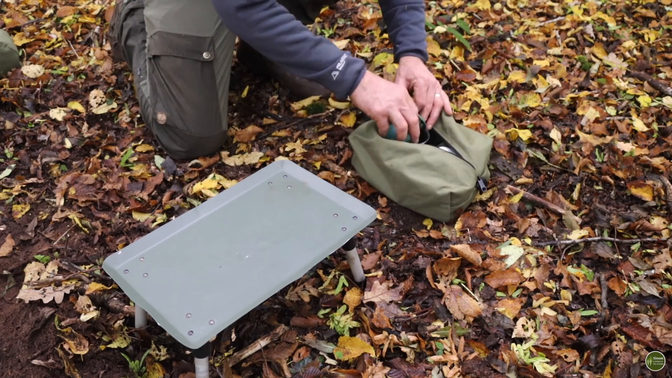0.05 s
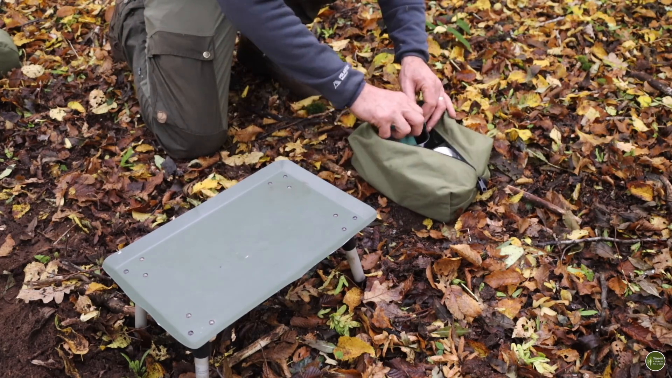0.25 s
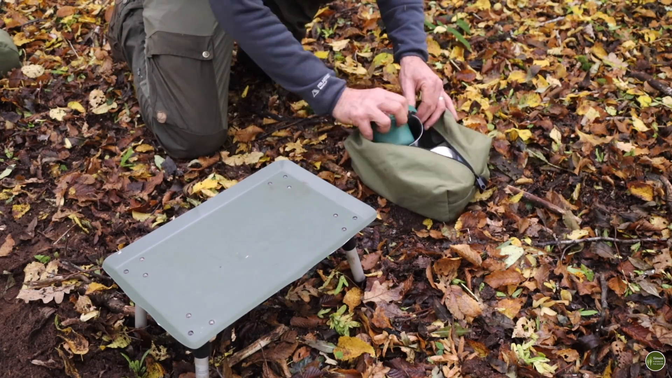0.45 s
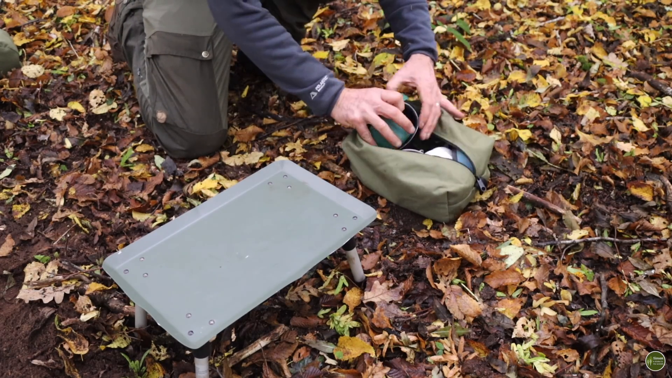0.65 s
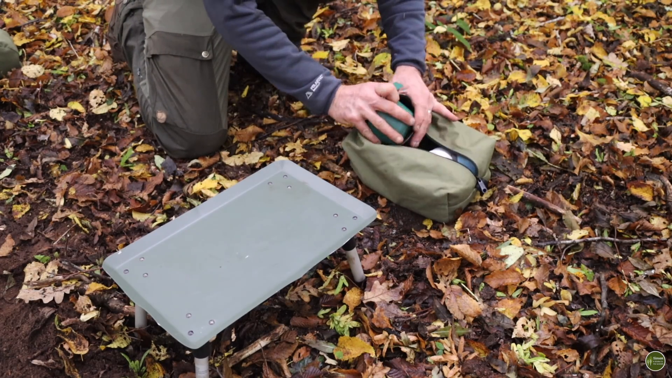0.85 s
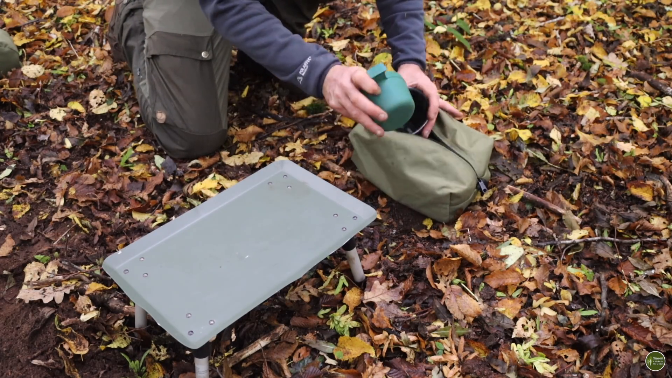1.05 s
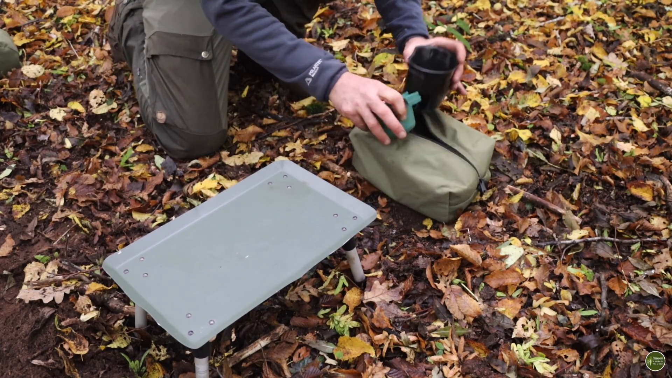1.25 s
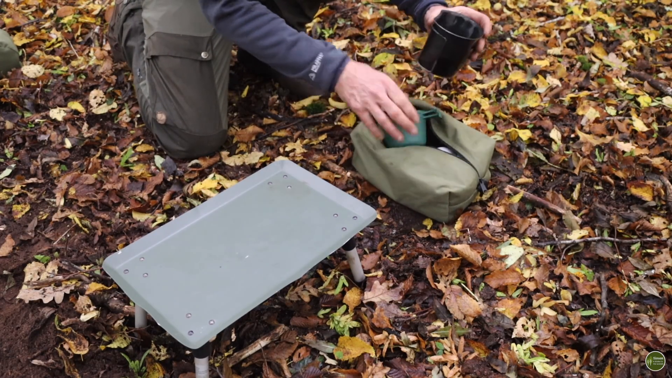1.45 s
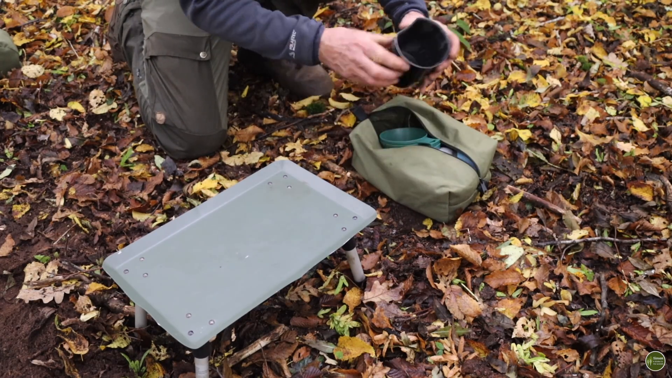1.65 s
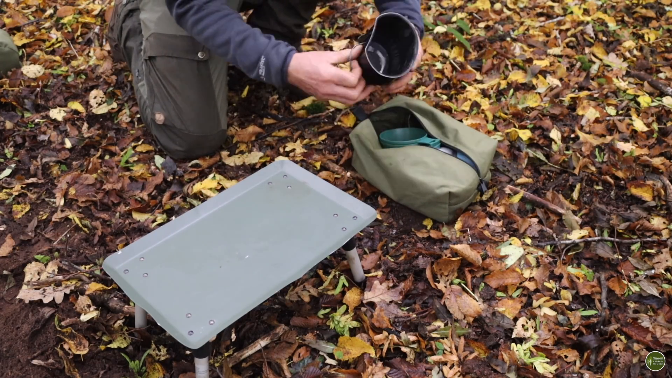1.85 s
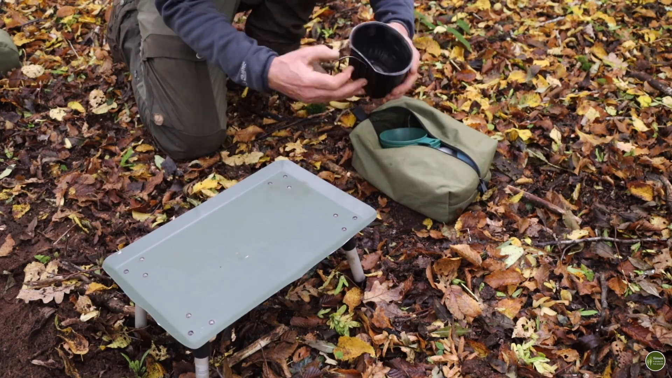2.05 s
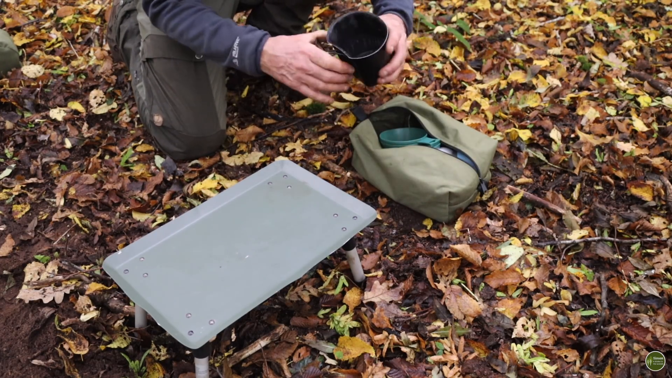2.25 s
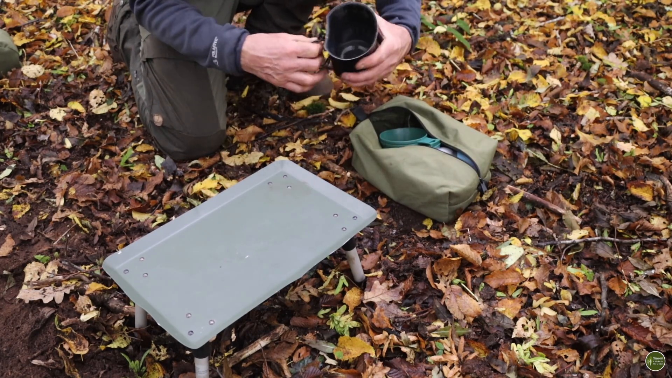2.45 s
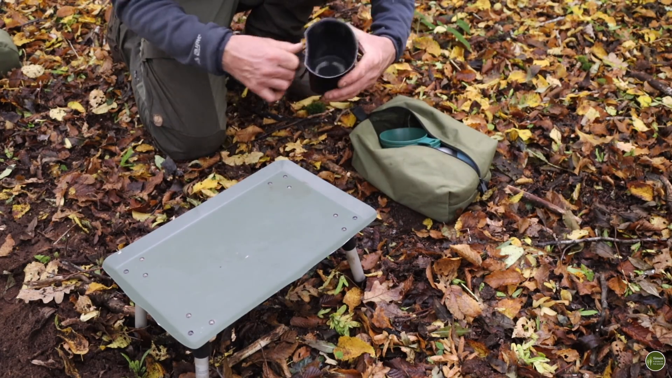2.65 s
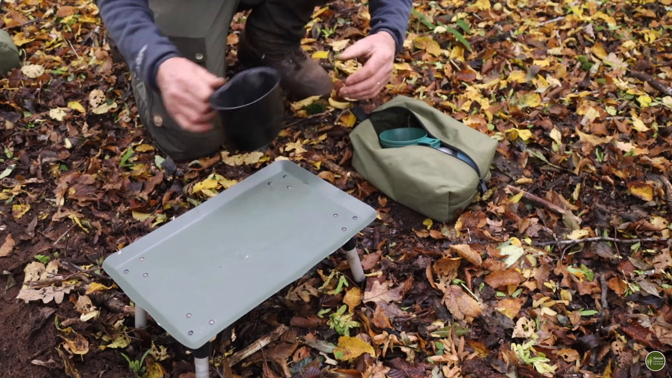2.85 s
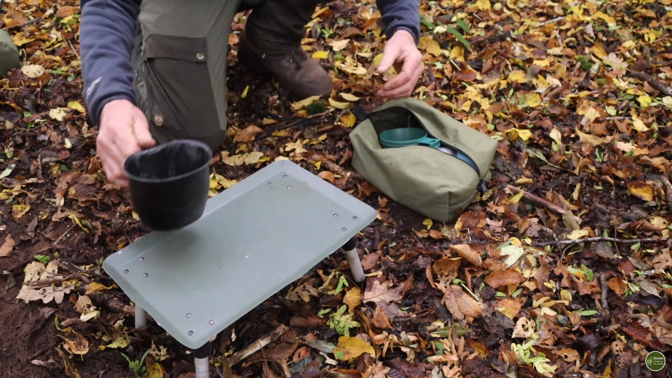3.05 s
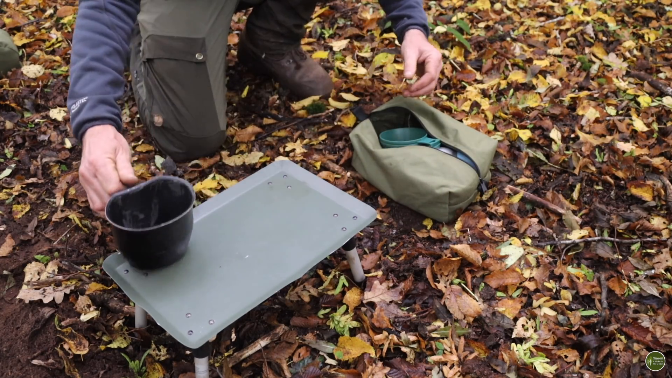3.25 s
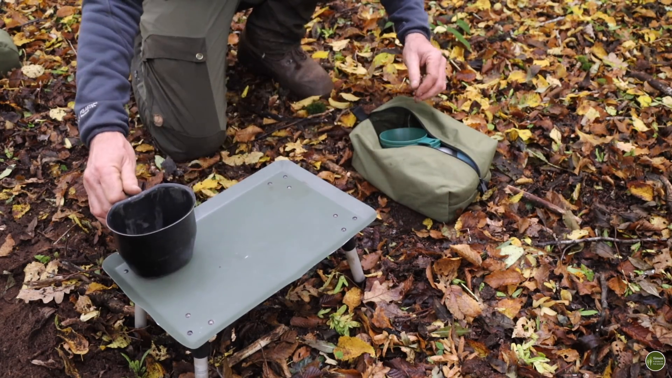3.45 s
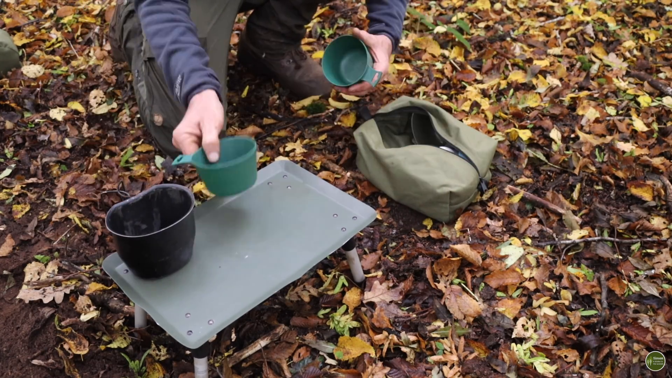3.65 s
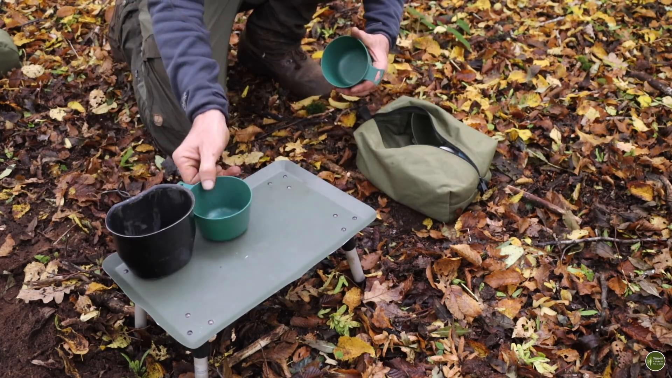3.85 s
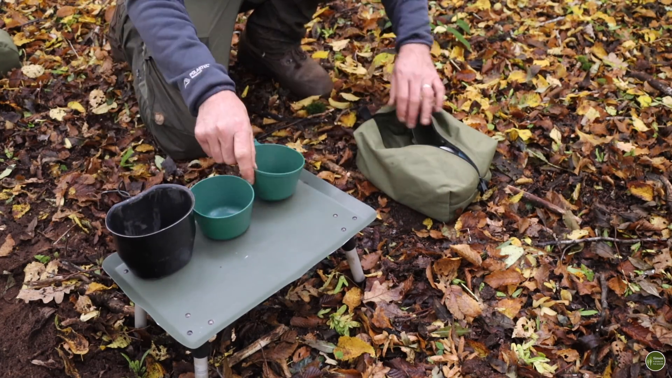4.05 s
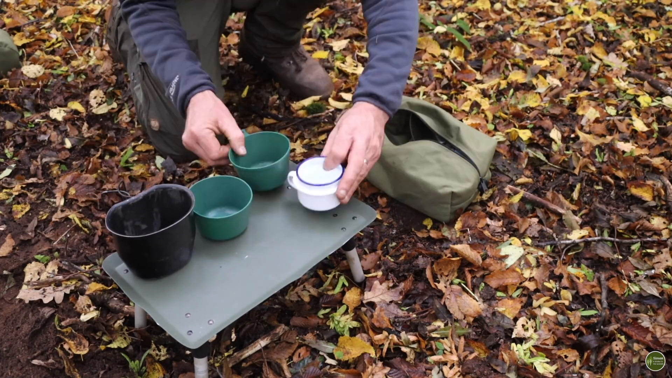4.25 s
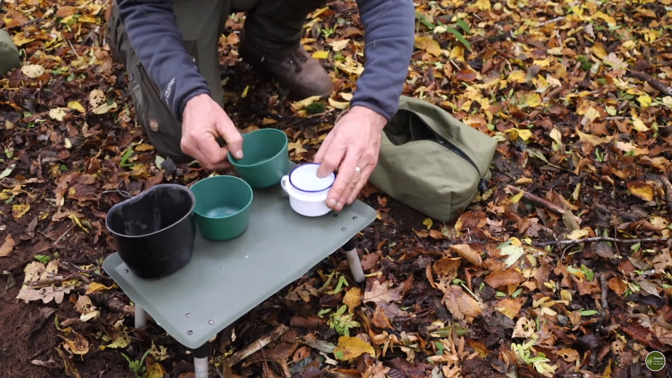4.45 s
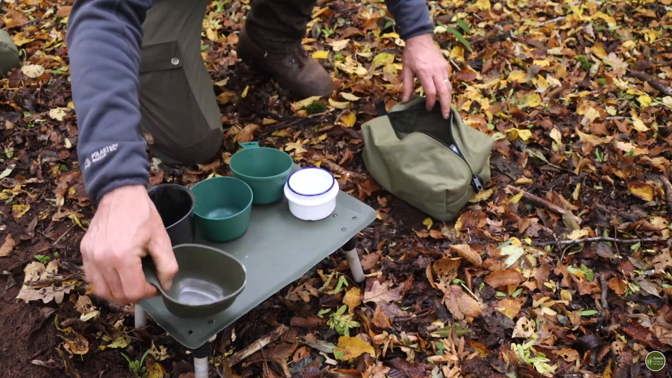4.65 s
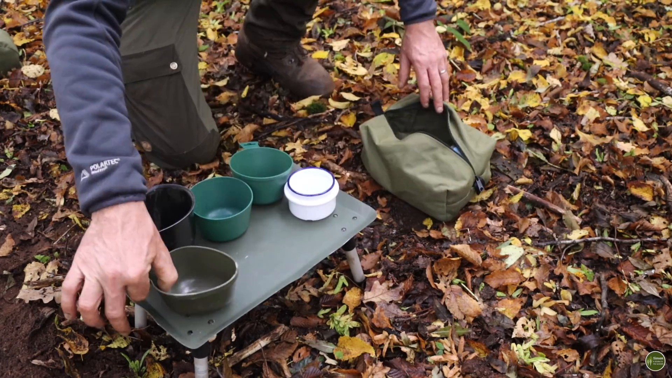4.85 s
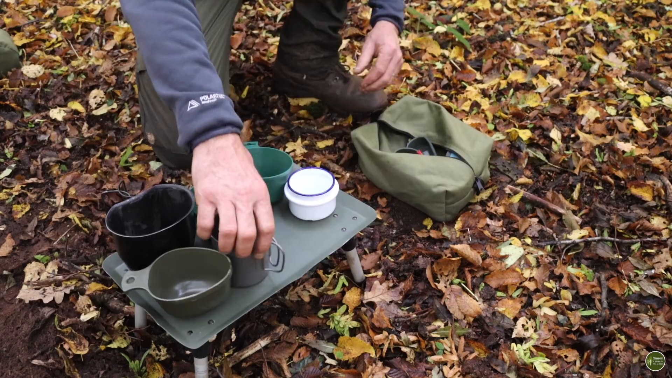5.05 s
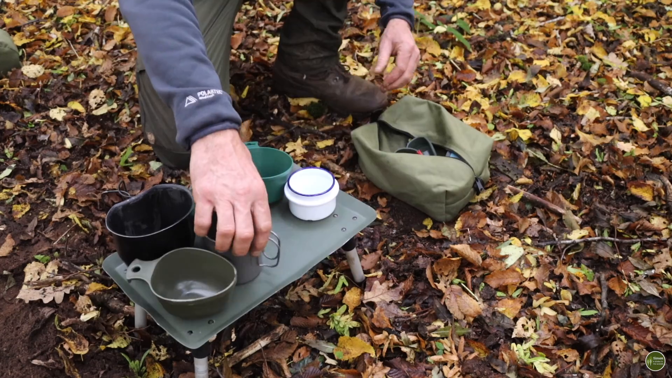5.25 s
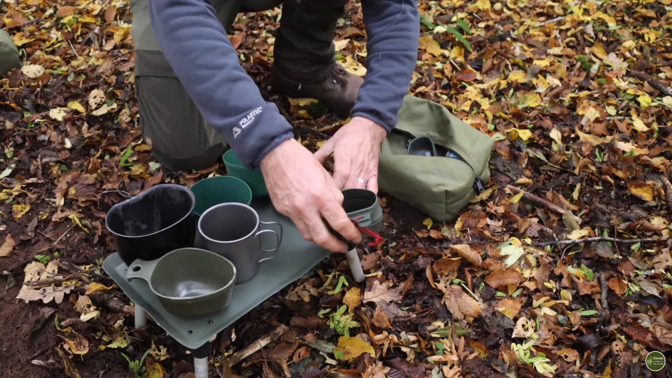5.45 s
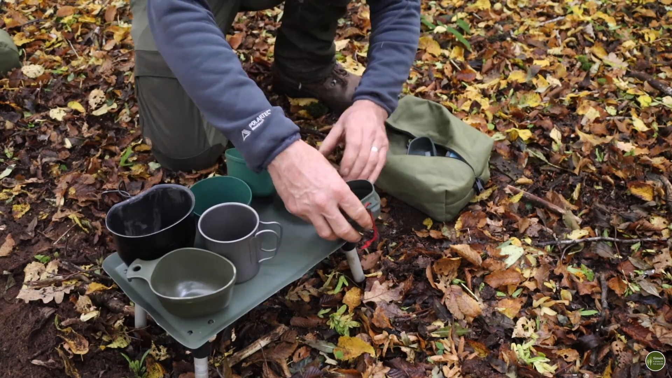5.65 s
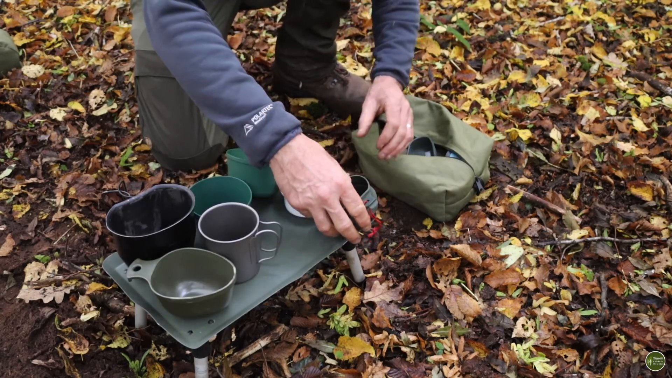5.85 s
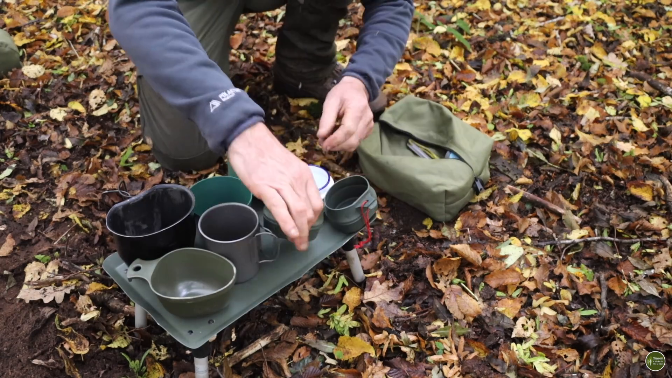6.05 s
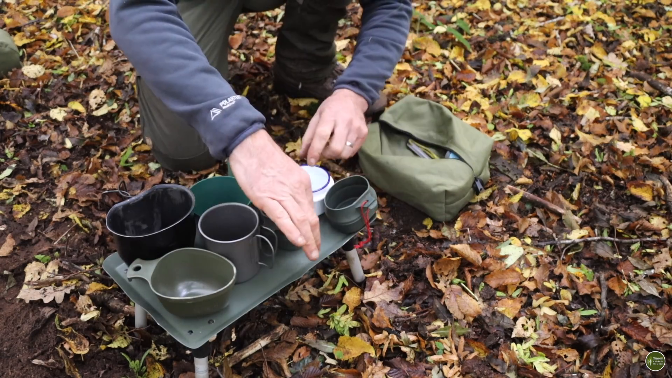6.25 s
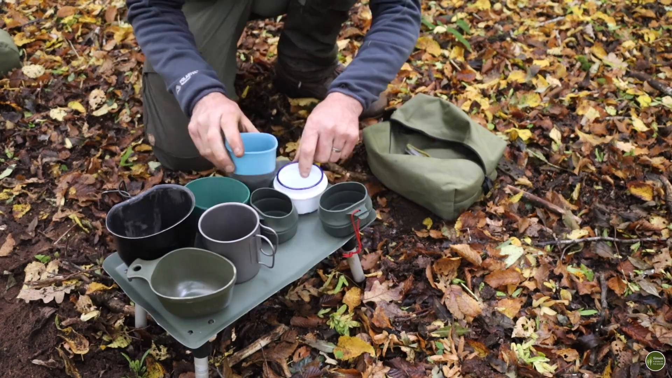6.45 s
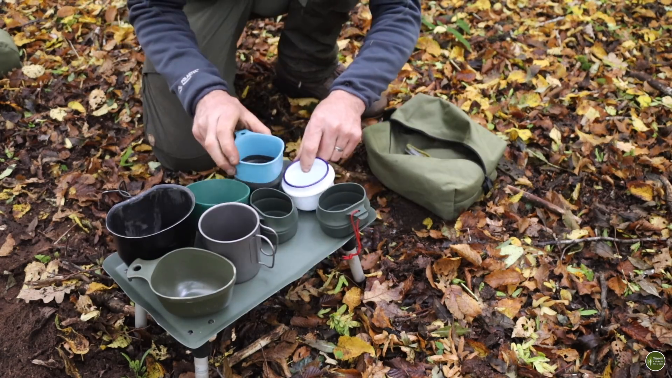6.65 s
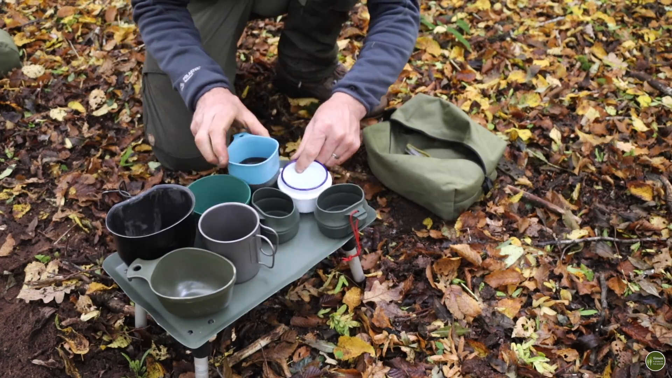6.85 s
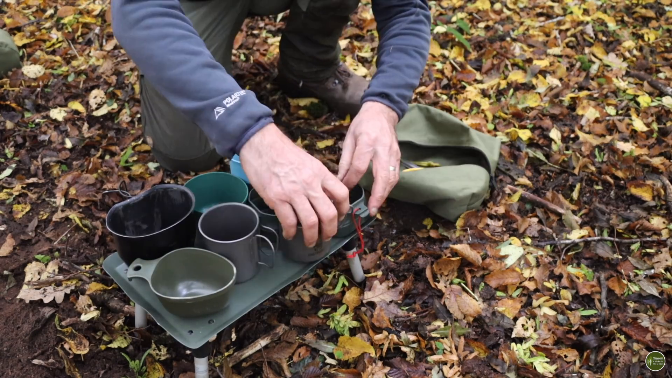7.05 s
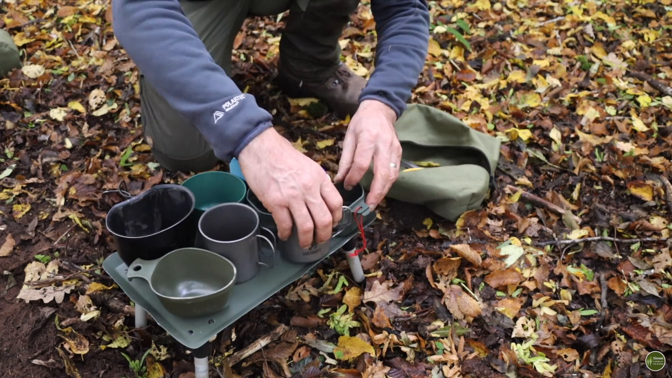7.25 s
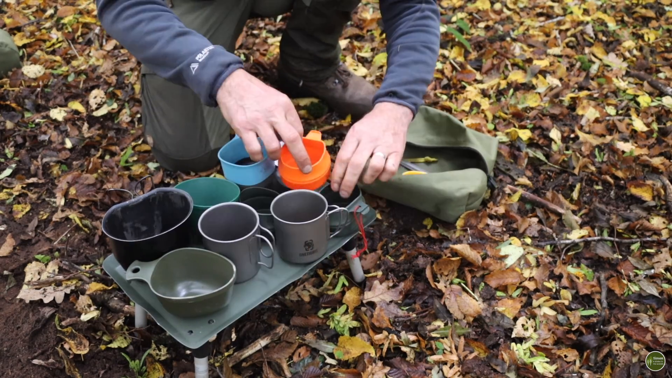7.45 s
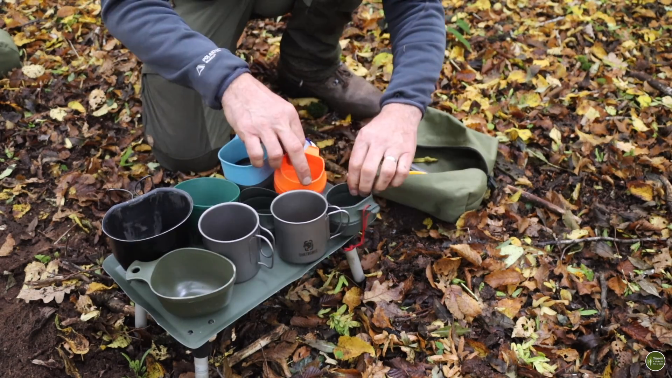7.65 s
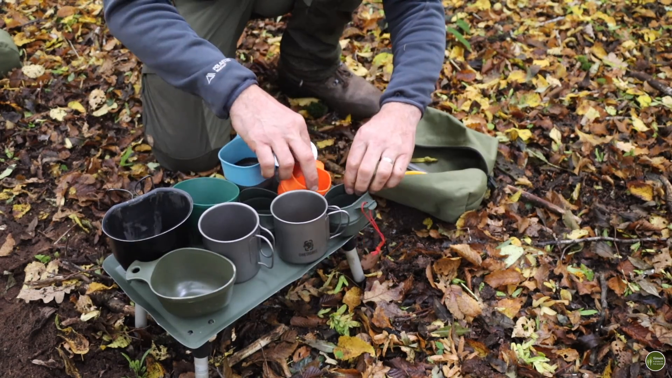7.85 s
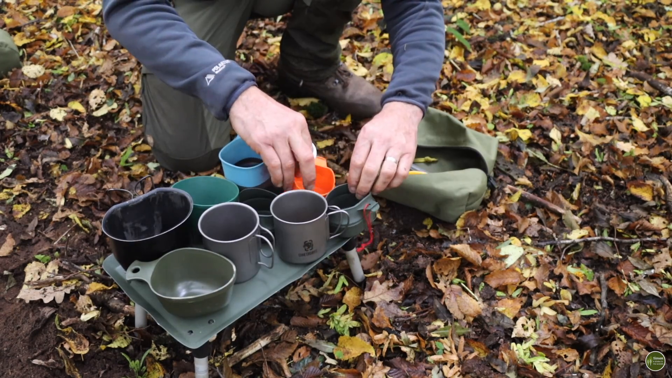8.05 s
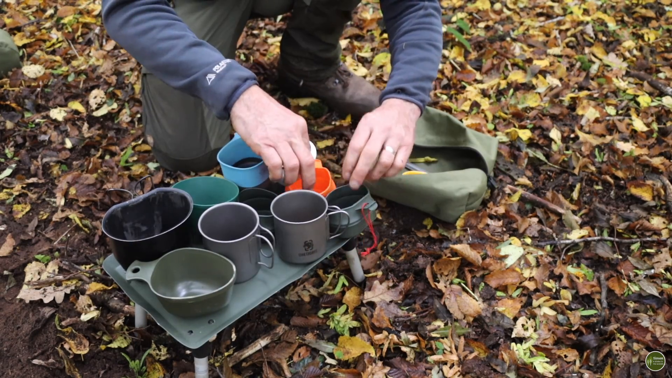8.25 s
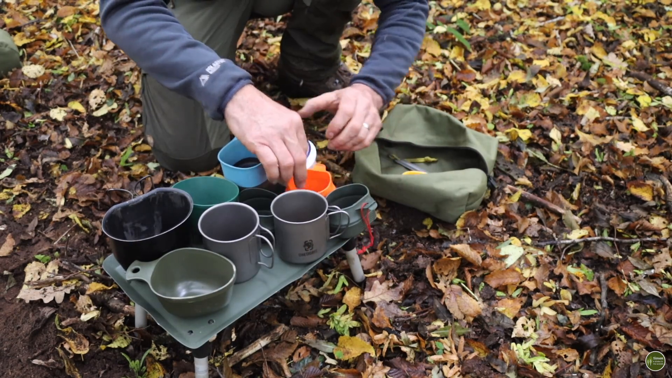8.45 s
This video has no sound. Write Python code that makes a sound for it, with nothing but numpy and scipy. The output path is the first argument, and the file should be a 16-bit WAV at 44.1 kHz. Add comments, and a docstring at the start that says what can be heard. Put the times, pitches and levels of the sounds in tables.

```python
"""Camping mugs, close to the microphone in a quiet wood: filtered noise and struck modes knock on a folding
table. First, random slips rub in a cloth bag; wire handles and rims click in the hands, and a cup's hollow
hums. Then plastic and metal mugs land edge first, rock, rattle and slide into place on stick-slip grit. Steel
rims ring faintly as decaying sines; a thin cup chinks with a splash of high modes. Shaped noise gives the far
rumble and leaf hiss; the hardest knocks are flattened at full scale."""
import sys
import numpy as np
from scipy import signal
from scipy.fft import rfft, irfft, next_fast_len
from scipy.io import wavfile
from scipy.ndimage import map_coordinates

SR = 44100
rng = np.random.default_rng(int(sys.argv[2]) if len(sys.argv) > 2 else 0)


def bounce(signal):
    """Save signal as a 16-bit WAV file at the path given by the first command-line argument."""
    frames = np.transpose(np.atleast_2d(signal))
    limited = np.clip(frames, -1, 1)
    pcm = np.round(limited * 32767).astype(np.int16)
    wavfile.write(sys.argv[1], SR, pcm)


N = 375732

# cloth and mugs rubbing in the bag: [t/s, level/dB]
BAG_LEVEL = [(0, -47.5), (.42, -45), (.55, -39.5), (1.5, -41.5), (2.15, -49), (2.769, -53)]
# colour of the cloth rub: [f/Hz, relative level/dB]
CLOTH_COLOUR = [(40, -7), (180, 12.5), (700, 8), (1200, 3.5), (2500, 4.5), (5000, -1), (15000, -28)]
# colour of the distant wood: [f/Hz, relative level/dB]
WOODS_COLOUR = [(30, -23.5), (110, -6), (249, -16), (1040, -15.5), (2000, -30.5), (3340, -27.5),
                (16000, -44.5)]
# mugs and wire handles touching in the hands: [t/s, level/dB, bite/dB, t60/s]
HAND_CLINKS = [(0.072, -31, -3, 0.032), (0.336, -24.5, 5, 0.048), (0.476, -20, 1, 0.075),
               (0.4854, -15.5, 2.5, 0.23), (0.5493, -22, 0, 0.087), (0.633, -32.5, 5, 0.061),
               (0.7164, -17.5, -7, 0.15), (0.728, -19, -1, 0.088), (0.7924, -26, 0.5, 0.064),
               (0.8328, -18, 6.5, 0.059), (0.843, -23, 7, 0.059), (0.9622, -12.5, -2, 0.2),
               (1.0816, -28.5, -19.5, 0.038), (1.157, -33, -23, 0.066), (1.2209, -19.5, -17, 0.19),
               (1.302, -11, -0.5, 0.077), (1.425, -22.5, -7.5, 0.11), (1.567, -17, -17.5, 0.035),
               (1.583, -19, 21, 0.069), (1.647, -13, -14.5, 0.064), (1.683, -15.5, -1.5, 0.16),
               (1.7812, -19.5, 7.5, 0.12), (1.956, -21, -2, 0.27), (2.0903, -18.5, -1.5, 0.2),
               (2.14, -9, -1, 0.096), (2.248, -25.5, 1, 0.15), (2.358, -20, 0, 0.035),
               (2.47, -14, 0, 0.054), (2.618, -28, -0.5, 0.048), (2.7283, -27.5, -8, 0.065),
               (2.753, -32.5, 3, 0.077), (5.0899, -15.5, -5.5, 0.12), (6.713, -34, 12, 0.013),
               (6.749, -30, 12, 0.044), (7.84, -28.5, -6, 0.013), (8.017, -29.5, -4, 0.18)]
# a steel rim left to ring: [t/s, level/dB over the mode levels, centre of the excited modes f/Hz,
# share of the free ring time]
RIM_RINGS = [(0.729, -32, 3980, 0.92), (1.25, -42, 1400, 0.77), (1.302, -32.5, 1390, 0.94),
             (1.583, -30.5, 4150, 0.75), (2.469, -30.5, 4600, 0.67), (5.521, -35, 1660, 0.51),
             (7.014, -45, 1550, 0.71)]
# modes of the steel mug: [f/Hz, relative level/dB, free t60/s]
STEEL_MODES = [(952, 13.5, 0.28), (1560, 11.5, 0.53), (2250, 21, 0.11), (2690, 12, 0.17), (3590, 7, 0.26)]
# a mug scraping in the hands: [start t/s, end t/s, level/dB, tilt/(dB per octave)]
HAND_SCRAPES = [(1.235, 1.283, -25, 0.5), (1.898, 1.932, -24, -2), (2.109, 2.19, -27, -3.5)]
# resonances of the handled cup: [f/Hz, relative level/dB]
CUP_MODES = [(740, 1.8), (2130, 5), (2720, 8.5), (3170, 7.7), (4300, 1.2)]
# a mug lands on one edge, then rocks onto its base:
# [t/s, level/dB, hollow f/Hz, bite/dB, rocking time/s, second contact relative level/dB]
MUG_LANDINGS = [(3.3297, -10, 480, -2.5, 0.035, -0.5), (3.8375, -7, 562, -7, 0.033, -10.5),
                (3.8981, -13.5, 334, -11, 0.018, -14), (4.1196, -7, 940, -15.5, 0.068, -15.5),
                (4.391, -5, 946, -4.5, 0.0072, -11.5), (4.7769, -6.5, 477, -6.5, 0.026, -22),
                (5.136, -11.5, 409, -16, 0.034, -28), (5.517, -8, 520, -7.5, 0.043, -14.5),
                (5.7, -10, 486, -10.5, 0.095, -11), (6.234, -6, 445, -12, 0.042, -17),
                (6.6916, -8, 420, -4.5, 0.054, -17.5), (6.9054, -11.5, 480, -9, 0.029, -1.5),
                (7.2496, -16, 507, -6.5, 0.059, -14.5), (7.376, -13, 524, -4.5, 0.057, -8),
                (7.9579, -15.5, 528, -14.5, 0.025, -22)]
# a mug is bumped while being pushed into place: [t/s, level/dB, bite/dB]
MUG_BUMPS = [(3.4136, -25.5, -4), (3.494, -31.5, -11), (4.207, -26, -13), (4.3844, -12, -4),
             (4.912, -21.5, -11.5), (4.954, -26.5, -15), (5.354, -16.5, -10), (5.377, -18.5, -22),
             (5.461, -19.5, -5), (5.469, -14, -13), (5.767, -27.5, -9), (6.5514, -14.5, -13),
             (6.641, -19.5, 2), (7.014, -19, -19), (7.172, -22, -3), (7.3586, -20, -14.5), (7.445, -34, 12),
             (7.537, -31, -18), (7.579, -27, 9), (7.681, -26.5, -5), (7.701, -25, -13), (7.793, -23.5, -18),
             (7.816, -24, -16), (7.879, -34.5, -9), (8.118, -34.5, -7), (8.165, -20, -14), (8.238, -35, -5),
             (8.337, -22, -11), (8.361, -45, 14), (8.481, -32.5, -12.5)]
# resonances of the table top: [f/Hz, relative level/dB]
TABLE_MODES = [(340, -1.5), (465, -0.5), (820, -1.5), (990, 3), (1450, -1), (2450, -1), (3150, 1)]
# a base sliding on the table: [start t/s, end t/s, level/dB, tilt/(dB per octave)]
BASE_SLIDES = [(4.326, 4.38, -26, -7.5), (4.488, 4.51, -29, -4.5), (4.52, 4.59, -36.5, -7.5),
               (4.955, 5.005, -35, -6.5), (5.245, 5.42, -27, -3.5), (6.415, 6.556, -32.5, -5.5),
               (6.865, 6.91, -25, -8.5), (6.965, 7.17, -40, -9), (7.275, 7.376, -36.5, -1),
               (7.69, 7.755, -39, -6.5), (7.928, 7.957, -30, -11)]
# the thin metal cup touches its neighbour, then chinks: [t/s, level/dB, bite/dB]
CUP_CHINKS = [(6.0635, -17, -16), (6.0965, -10.5, 3)]
# clear modes of the thin metal cup: [f/Hz, relative level/dB]
THIN_CUP_MODES = [(4194, -47), (4400, -47), (6770, -48)]

TOP_HZ = 15950  # band limit
SIZE = 16384  # samples in one contact
T = np.arange(SIZE) / SR  # s
HZ = np.fft.rfftfreq(SIZE, 1 / SR)

# which of a mug's many wall modes ring depends on where it is held and hit:
# (lowest f/Hz, highest f/Hz, relative level/dB)
HELD_WALL = (1300, 9800, 8.1)
STANDING_WALL = (550.3, 5000, 4.6)
THIN_WALL = (5700, 15500, 13.5)  # crowded upper modes of the thin cup
DETUNE = 0.042  # grip and point of contact shift the modes (typical share of their frequency)
HIGH_MODE_DAMPING = 0.1  # ring time falls with frequency (exponent)
GRIP_S = 0.045  # the point of contact moves on this often
CHATTER_RISE_S = 0.00049  # time scale on which the surfaces meet fully

# the cloth crackles and mugs tap inside it: softest level over the rubbing, and range above that
CRACKLE_OVER_DB, CRACKLE_RANGE_DB = -6, 13
CRACKLE_LOW_HZ, CRACKLE_HIGH_HZ, CRACKLE_T60_S = 1000, 4500, 0.04

# the top treble of a clink grows with its bite and with its strength (dB per dB)
TICK_PER_BITE, TICK_PER_LEVEL = 0.74, 0.58
# a sharper contact lifts the body of the sound (Hz at zero bite, octaves per dB)
CLINK_HOLLOW_HZ, HOLLOW_PER_BITE = 840, 0.031
GRAZE_S, GRAZE_DB = 0.019, -21.5  # a rim grazes this long before it clicks, this much more softly

SWELL_DB = 5.5  # a stroke presses harder towards its end
CATCHES_PER_S, CATCH_DB = 110, -2.5  # coarse jerks: mean rate, and level over the fine grit

BUMP_HOLLOW_HZ = 420
KNOCK_TICK_DB = -12.5  # top treble of a full-scale knock, relative to its bite
KNOCK_TICK_PER_LEVEL = 0.31  # softer knocks lose treble (dB per dB)
PUSH_PER_LEVEL = 0.51  # soft knocks lack the first sharp push (dB per dB)
KNOCK_CYCLES = 46.5  # cycles of the hollow in which a knock loses 60 dB
BOOM_DB, BOOM_CYCLES = 8.5, 54  # hollow of a knocked mug: relative level, and cycles to lose 60 dB
ROCK_DEEPENS, ROCK_DULLS_DB = 0.96, 2  # contact on the whole base is deeper (ratio) and duller
REBOUND_S, REBOUND_DB = 0.008, -10.5  # two rebounds within this time; level at the bump hollow
RATTLE_S, RATTLE_DB = 0.06, -18.5  # wobble after the second contact: longest delay, relative level

CHINK_TICK_DB, CHINK_RING_DB = 2, -10.5  # top treble and clear ring, relative to the bite


def amp(db):
    """Level in dB as a factor."""
    return 10 ** (np.asarray(db) / 20)


def unit(x):
    """x at rms 1."""
    return x / np.sqrt(np.mean(x ** 2) + 1e-20)


def unit_hit(x):
    """x with the energy of 10 ms at rms 1."""
    return x / np.linalg.norm(x) * np.sqrt(SR / 100)


def fade(t60):
    """A decay that loses 60 dB in t60 seconds."""
    return np.exp(-np.log(1000) * T / max(t60, 1e-3))


def along(points, hz):
    """Values between (Hz, value) points on a log axis."""
    f, v = np.transpose(points)
    return np.interp(np.log(hz + 1), np.log(f + 1), v)


def lowpass(hz, corner_hz):
    """Gain of a gentle low-pass; around a shifted centre it is a resonance."""
    return 1 / (1 + 1j * hz / corner_hz)


def highpass(hz, corner_hz):
    """Gain of a high-pass that falls 12 dB per octave."""
    return (hz / np.hypot(hz, corner_hz)) ** 2


def filtered(x, gain):
    """x times a gain that depends on frequency."""
    m = next_fast_len(len(x) + SIZE)
    return irfft(rfft(x, m) * gain(np.fft.rfftfreq(m, 1 / SR)), m)[:len(x)]


def causal(db):
    """The minimum-phase response with these levels."""
    cepstrum = irfft(db) * np.log(10) / 20
    cepstrum[1:SIZE // 2] *= 2
    cepstrum[SIZE // 2 + 1:] = 0
    return np.exp(rfft(cepstrum))


def add(track, s, x):
    """Mix x into the track from time s."""
    start = round(s * SR)
    part = track[start:start + len(x)]
    part += x[:len(part)]


def wobble(count, rate):
    """A smooth random curve, rate knots a second."""
    knots = rng.standard_normal(int(count * rate / SR) + 4)
    return map_coordinates(knots, [np.arange(count) * rate / SR])


def grit(count, rate, spread_db):
    """Stick-slip: tiny impulses of very unequal size at random moments."""
    slips = rng.random(count) < rate / SR
    signs = np.sign(rng.standard_normal(count))
    sizes = amp(spread_db * rng.standard_normal(count).clip(-2, 2))
    return unit(slips * signs * sizes)


def burst(t60):
    """Dying noise of energy 1: a crowd of unresolved modes."""
    x = rng.standard_normal(SIZE) * fade(t60)
    return x / np.linalg.norm(x)


def ringing(modes, t60):
    """A body's modes struck at new strengths, tunings and phases; low modes last longest."""
    chance = rng.standard_normal((len(modes), 3))
    middle_hz = np.median([hz for hz, _ in modes])
    waves = np.zeros(SIZE)
    for (hz, db), (strength, phase, tuning) in zip(modes, chance):
        wave = np.sin(2 * np.pi * hz * (1 + DETUNE * tuning) * T + np.pi * phase)
        decay = fade(t60 * (middle_hz / hz) ** HIGH_MODE_DAMPING)
        waves += amp(db + 2 * strength) * wave * decay
    return 2 * waves / fade(t60).sum()


def wall(span, count):
    """A fresh draw of a mug's wall modes, as (Hz, dB) rows."""
    low_hz, high_hz, db = span
    places = (np.arange(count) + rng.random(count)) / count
    return [(low_hz * (high_hz / low_hz) ** u, db) for u in places]


def rubbed(slips, modes, span, ring_db):
    """Slips shake a body, which answers anew as the point of contact wanders."""
    rub, step = np.zeros(len(slips) + SIZE), round(GRIP_S * SR)
    for start in range(0, len(slips), step):
        ring = ringing(modes, 0.029) + ringing(wall(span, count=5), 0.046)
        body = burst(0.015) + amp(ring_db) * ring
        add(rub, start / SR, signal.fftconvolve(slips[start:start + step], body))
    return rub


def bag():
    """Cloth and fingers rub on the mugs as they are dug out, with small ticks and taps of varied pitch."""
    s, db = np.transpose(BAG_LEVEL)
    track, count = np.zeros(N), round(s.max() * SR)
    slips = grit(count, rate=1400, spread_db=3.5) * amp(4.2 * np.tanh(wobble(count, rate=30)))
    body = rubbed(slips, CUP_MODES, HELD_WALL, ring_db=-1.0)[:count]
    rub = unit(filtered(body, lambda hz: amp(along(CLOTH_COLOUR, hz))))
    add(track, 0, rub * amp(np.interp(np.arange(count) / SR, s, db)))
    for when, size, pitch in rng.random(size=(120, 3)):
        at = s.max() * when
        tick_hz = CRACKLE_LOW_HZ * (CRACKLE_HIGH_HZ / CRACKLE_LOW_HZ) ** pitch
        tick = filtered(burst(CRACKLE_T60_S), lambda hz: highpass(hz, tick_hz) * lowpass(hz, tick_hz))
        # squaring leaves most ticks soft
        tick_db = np.interp(at, s, db) + CRACKLE_OVER_DB + CRACKLE_RANGE_DB * size ** 2
        add(track, at, amp(tick_db) * unit_hit(tick))
    return track


def woods():
    """Steady far rumble and the hiss of air in the leaves, as coloured noise."""
    noise = rng.standard_normal(N)
    return amp(-49) * unit(filtered(noise, lambda hz: amp(along(WOODS_COLOUR, hz))))


def blow(hollow_hz, bite_db, tick_db, t60, ring, push_db, chatter_db, treble_life):
    """One contact: a push, the ring and chattering dense modes, coloured by the hollow; rms 1 over 10 ms."""
    treble = highpass(HZ, 2500)
    # high modes die sooner than low ones
    low_crowd = np.sqrt(1 - treble) * rfft(burst(t60))
    high_crowd = np.sqrt(treble) * rfft(burst(t60 * treble_life))
    crowd = irfft(low_crowd + high_crowd)
    crowd *= amp(chatter_db * wobble(SIZE, rate=302.0))  # the surfaces rebound and touch again
    crowd *= np.tanh(T / CHATTER_RISE_S) * (T < T.max() / 2)
    strike = amp(push_db) * (T == 0) + ring + crowd / np.linalg.norm(crowd)
    shape = [(40, -38), (hollow_hz / 4, -18), (hollow_hz / 1.86, -5), (hollow_hz, 0), (hollow_hz * 1.47, -5),
             (2800, bite_db), (9000, tick_db), (TOP_HZ, tick_db - 4.5)]
    return unit_hit(irfft(rfft(strike) * causal(along(shape, HZ))))


def clink(db, bite_db, t60):
    """A rim or handle clicks and drags, ringing the cup; harder clicks are brighter."""
    tick_db = TICK_PER_BITE * bite_db + TICK_PER_LEVEL * db
    ring = amp(4.5) * ringing(CUP_MODES, 0.058) + ringing(wall(HELD_WALL, count=6), 0.092)
    hollow_hz = CLINK_HOLLOW_HZ * 2 ** (HOLLOW_PER_BITE * bite_db)
    hit = blow(hollow_hz, bite_db, tick_db, t60, ring, push_db=-26, chatter_db=2.5, treble_life=0.64)
    return amp(db) * hit


def clinks():
    """Mugs and handles meet in the hands: a light graze, then the click."""
    track = np.zeros(N)
    for s, db, bite_db, t60 in HAND_CLINKS:
        add(track, s - GRAZE_S, amp(GRAZE_DB) * clink(db, bite_db, t60))
        add(track, s, clink(db, bite_db, t60))
    return track


def rims():
    """Metal rims sing on after a contact; the point of contact picks low or high modes."""
    track = np.zeros(N)
    for s, db, centre_hz, share in RIM_RINGS:
        for hz, mode_db, t60 in STEEL_MODES:
            off_centre_db = -12.3 * np.log2(hz / centre_hz) ** 2
            tone = fade(t60 * share) * np.sin(2 * np.pi * hz * T)
            add(track, s, amp(db + mode_db + off_centre_db) * tone)
    return track


def strokes(rows, modes, span, low_hz, top_hz, ring_db):
    """A sliding surface slips in fine grains and catches in coarse jerks; the stroke swells and dies."""
    track = np.zeros(N)
    for start, end, db, tilt_db in rows:
        count = round((end - start) * SR)
        swell_db = SWELL_DB * np.arange(count) / count
        unsteady_db = 3.7 * np.tanh(wobble(count, rate=105.3))
        pressure = signal.windows.tukey(count, 0.3) * amp(unsteady_db + swell_db)
        fine = grit(count, rate=1000, spread_db=3.5)
        coarse = grit(count, CATCHES_PER_S, spread_db=0.5)
        slips = (fine + amp(CATCH_DB) * coarse) * pressure

        def colour(hz):
            """Gain: the stroke's tilt, chiefly above 900 Hz, within its band."""
            tilt = amp(tilt_db * np.log2(1 + hz / 900))
            return tilt * highpass(hz, low_hz) * lowpass(hz, top_hz) ** 2

        rub = filtered(rubbed(slips, modes, span, ring_db), colour)
        add(track, start, amp(db) * rub / np.linalg.norm(rub) * np.sqrt(count))
    return track


def scrapes():
    """Scraping in the hands rings the cup."""
    return strokes(HAND_SCRAPES, CUP_MODES, HELD_WALL, low_hz=445, top_hz=10000, ring_db=1.5)


def hollow():
    """Slips of the rubbed wire handles keep the air in the large cup humming."""
    start, end, centre_hz, db = 1.82, 2.5, 715, -39.5  # s, s, Hz, dB
    track, count = np.zeros(N), round((end - start) * SR)
    pressure = signal.windows.tukey(count, 0.25) * amp(5.8 * wobble(count, rate=15.4))
    slips = grit(count, rate=320, spread_db=3.0) * pressure
    hum = filtered(slips, lambda hz: lowpass(hz - centre_hz, 58) ** 2)
    add(track, start, amp(db) * unit(hum))
    return track


def knock(db, hollow_hz, bite_db):
    """A mug meets the table top and chatters; its decay spans set cycles, so deep knocks last longer."""
    t60 = KNOCK_CYCLES / hollow_hz
    ring = amp(8.0) * ringing(TABLE_MODES, t60) + ringing(wall(STANDING_WALL, count=6), 0.033)
    ring += ringing([(hollow_hz, BOOM_DB)], BOOM_CYCLES / hollow_hz)
    tick_db = bite_db + KNOCK_TICK_DB + KNOCK_TICK_PER_LEVEL * db
    push_db = PUSH_PER_LEVEL * db
    hit = blow(hollow_hz, bite_db, tick_db, t60, ring, push_db, chatter_db=3.5, treble_life=0.21)
    chatter = hit.copy()
    lightness = (BUMP_HOLLOW_HZ / hollow_hz) ** 2  # light cups hardly chatter
    for delay in REBOUND_S * rng.random(size=2):
        add(chatter, delay, amp(REBOUND_DB) * lightness * hit)
    return amp(db) * chatter * np.linalg.norm(hit) / np.linalg.norm(chatter)


def knocks():
    """A mug set down knocks with its edge, then its base, and rattles to rest; a bump is a single knock."""
    track = np.zeros(N)
    for s, db, hollow_hz, bite_db, rock_s, second_db in MUG_LANDINGS:
        add(track, s, knock(db, hollow_hz, bite_db))
        base = hollow_hz * ROCK_DEEPENS, bite_db - ROCK_DULLS_DB
        add(track, s + rock_s, knock(db + second_db, *base))
        for delay in RATTLE_S * rng.random(size=2):
            add(track, s + rock_s + delay, knock(db + second_db + RATTLE_DB, *base))
    for s, db, bite_db in MUG_BUMPS:
        add(track, s, knock(db, BUMP_HOLLOW_HZ, bite_db))
    return track


def slides():
    """A sliding base sounds lower than a scrape and rings the table top."""
    return strokes(BASE_SLIDES, TABLE_MODES, STANDING_WALL, low_hz=235, top_hz=7800, ring_db=5.0)


def chinks():
    """The thin cup gives a splash of high modes and a short, clear ring."""
    track = np.zeros(N)
    for s, db, bite_db in CUP_CHINKS:
        tones = sum(amp(level) * np.sin(2 * np.pi * hz * T) for hz, level in THIN_CUP_MODES)
        ring = unit(tones) * fade(0.11)
        ring = ring * amp(6.3 * wobble(SIZE, rate=170))  # the rim buzzes against its neighbour
        splash = ringing(wall(THIN_WALL, count=10), 0.077)
        hit = blow(540, bite_db, bite_db + CHINK_TICK_DB, 0.11, splash,
                   push_db=-4.0, chatter_db=0.5, treble_life=1.0)
        add(track, s, amp(db) * (hit + amp(bite_db + CHINK_RING_DB) * ring))
    return track


def scene():
    """Mugs, bag and table close by, in the quiet of the wood."""
    near = bag() + clinks() + rims() + scrapes() + hollow() + knocks() + slides() + chinks()
    # trunks scatter a faint, dull answer; the leaf litter swallows the treble
    scattered = signal.fftconvolve(near, burst(0.7))[:N]
    trunks = filtered(scattered, lambda hz: lowpass(hz, 3500))
    return (near + amp(-21.0) * trunks + woods())[None]


def record(dry):
    """Peaks are flattened at full scale; nothing is kept above the band limit."""
    overloaded = np.clip(dry[0], -1, 1)
    return filtered(overloaded, lambda hz: hz < TOP_HZ)[None]


dry = scene()
out = record(dry)
bounce(out)
```